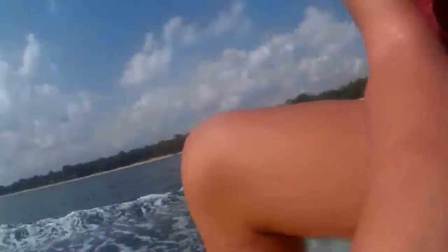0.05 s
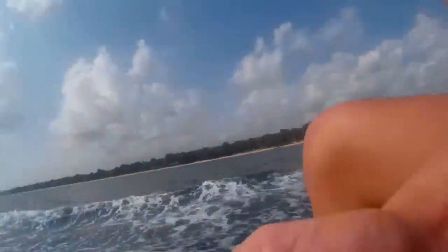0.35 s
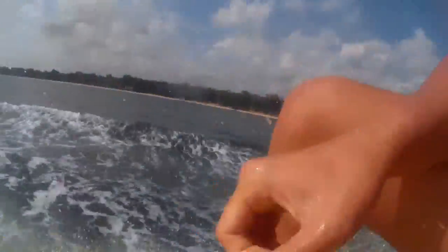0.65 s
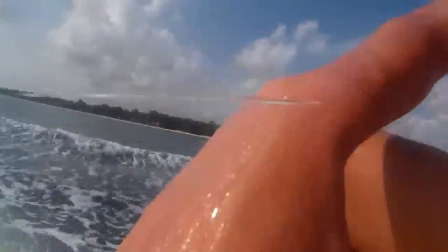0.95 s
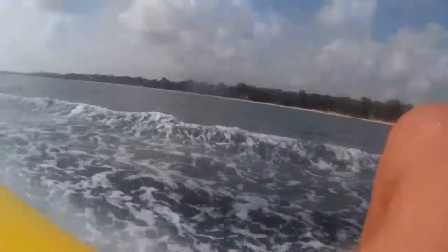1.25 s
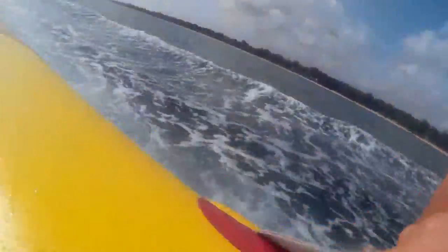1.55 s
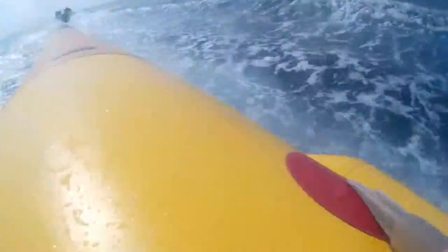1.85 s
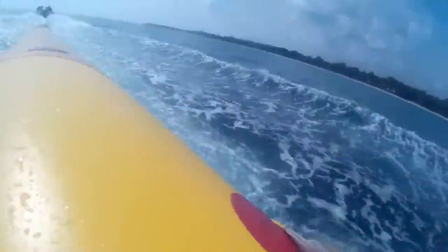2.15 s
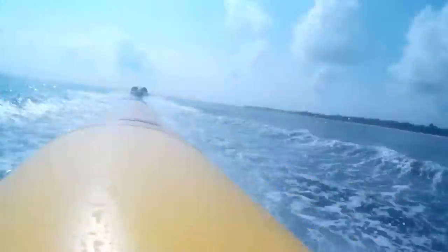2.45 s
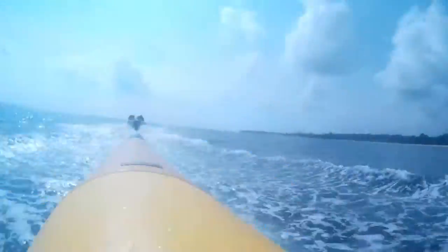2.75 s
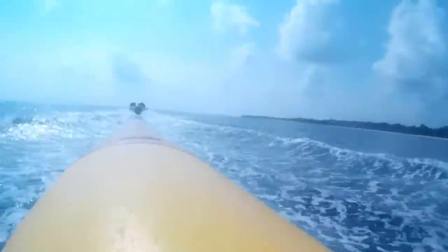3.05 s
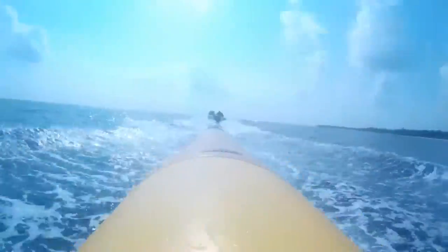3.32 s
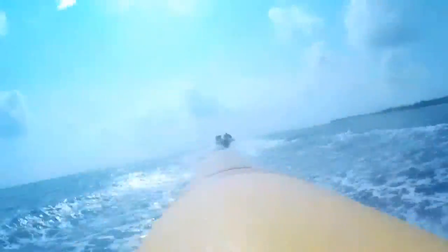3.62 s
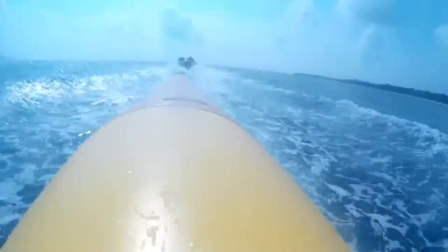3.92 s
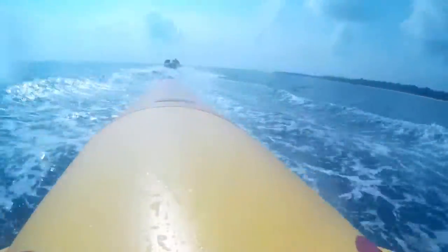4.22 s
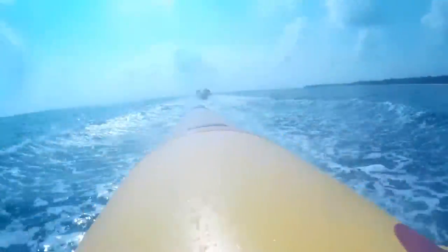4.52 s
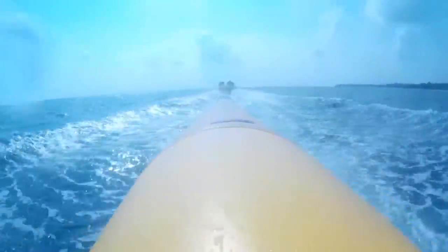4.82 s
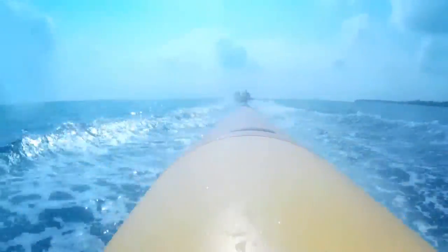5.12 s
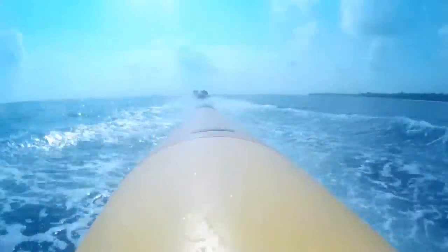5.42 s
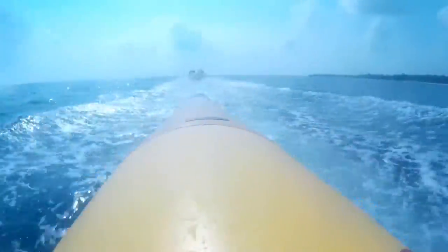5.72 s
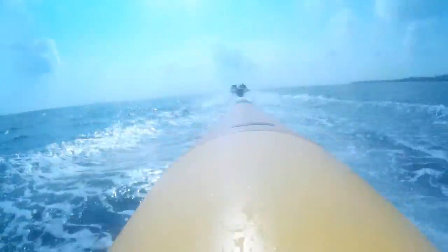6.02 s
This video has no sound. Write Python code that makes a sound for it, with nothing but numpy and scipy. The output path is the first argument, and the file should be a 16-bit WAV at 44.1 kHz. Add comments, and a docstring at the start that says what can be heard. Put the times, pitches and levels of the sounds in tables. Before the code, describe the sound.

Heard from inside a waterproof camera case on an inflatable towed over the sea, drops tick irregularly over buffeting wind and a muffled, gurgling wake. Fine spray sizzles past, then slugs of water thump and knock in quick succession, with one hard knock near the middle. Air hoots faintly and briefly in the mount. More thumps follow, the wind stays up, and a last sheet of spray sweeps over.

```python
"""A camera in a waterproof case rides an inflatable towed fast over the sea.
From the start, drops tick on the case and wind buffets it over the muffled wake and tow boat's engine.
Sheets of fine spray sizzle past; near 1.7 s slugs of water thump the wall in quick succession.
From 2.3 s air hoots in a gap of the mount. The hardest knock lands at 3 s, more thumps near 3.7 s.
Then the wind stays up, and a last sheet of spray sweeps over at 6.1 s."""
import sys
import numpy as np
from scipy import signal
from scipy.fft import rfft, irfft, next_fast_len
from scipy.io import wavfile

SR = 44100
rng = np.random.default_rng(int(sys.argv[2]) if len(sys.argv) > 2 else 0)


def inscribe(sig):
    """Save sig as 16-bit PCM at rate SR to the path in sys.argv[1].

    A 1-D sig is mono; a 2-D sig holds one channel per row.
    Samples are clipped to [-1, 1] before scaling.
    """
    pcm = np.round(np.clip(np.atleast_2d(sig).T, -1, 1) * 32767)
    wavfile.write(sys.argv[1], SR, pcm.astype(np.int16))


N = 276771
TIME_S = np.arange(N) / SR
HIT_TIME_S = np.arange(4096) / SR

# large drops on the case: t/s, relative level/dB, ring f/Hz, splatter re impact/dB
DROP_HITS = [(0.0839, -30, 4400, -7), (0.172, -34, 4090, -15), (0.2237, -31, 4460, -4.5),
             (0.3366, -29.5, 3160, -22), (0.4289, -28.5, 4640, -15), (0.5463, -26.5, 4400, -3),
             (0.616, -29, 4620, -2), (0.6714, -30, 3980, -5.5), (0.7156, -24.5, 2440, -10),
             (0.7364, -25.5, 4420, -7), (0.8264, -30.5, 4530, -5), (0.8919, -29, 4470, -3.5),
             (0.9968, -26.5, 4440, -9), (1.1638, -25.5, 2940, -3), (1.266, -32.5, 4540, -14),
             (1.5019, -31, 2810, -4), (1.6779, -17.5, 4170, 0), (1.7394, -28.5, 2350, -1.5),
             (1.7921, -22.5, 3900, 0), (1.8917, -28, 2350, -4.5), (2.1062, -36, 4500, -10),
             (2.158, -36, 3030, 4.5), (2.371, -26, 4300, -4.5), (2.4431, -23, 3900, -6),
             (2.466, -31, 4540, -11), (2.592, -25.5, 3910, -8), (2.6457, -21.5, 2350, -7),
             (2.6791, -29.5, 2945, -12), (2.7497, -21, 3920, 0.5), (2.8438, -22.5, 2310, 1),
             (2.8953, -31.5, 2960, -7.5), (3.1764, -26, 3230, -6), (3.2643, -28.5, 2970, -6.5),
             (3.3646, -32, 4680, -9), (3.5516, -28.5, 4610, -3.5), (3.6083, -17.5, 3960, -3.5),
             (3.6527, -30, 4490, 4), (3.715, -26.5, 3780, -20), (3.7303, -16.5, 3260, -4),
             (3.9477, -34, 2520, 3), (3.9646, -27, 3780, -10), (4.0827, -36, 4670, -16),
             (4.129, -26.5, 4600, -7.5), (4.162, -28.5, 4620, -5.5), (4.1999, -28.5, 4700, -9),
             (4.2416, -29.5, 4690, -13), (4.347, -28, 4520, -21), (4.411, -27.5, 4480, -6.5),
             (4.6377, -28.5, 4270, -19), (4.7651, -30, 4680, -1.5), (4.792, -27.5, 4610, -1),
             (4.8331, -24, 4600, -3), (4.8728, -27, 4670, -12), (4.9175, -28.5, 4600, -16),
             (5.009, -37.5, 4700, -8), (5.1233, -23, 3120, -6), (5.3108, -29, 3600, -13),
             (5.3895, -29.5, 4540, 0), (5.4635, -32, 4090, -1), (5.5884, -29.5, 4600, -21),
             (5.7848, -32, 2970, 1.5), (5.8186, -25, 3100, -9), (5.8606, -24, 4680, -10),
             (6.0013, -27.5, 3100, -5.5), (6.0788, -29, 2837, -3.5), (6.2452, -23, 2890, -5)]
# slugs of water flexing the case: t/s, level/dB, nominal f/Hz, gush re swing/dB
SLUG_HITS = [(0.183, -31.5, 70, -3.5), (0.215, -25.5, 68, -22), (0.54, -24.5, 110, -17),
             (0.791, -17.5, 72.5, -29), (1.631, -26, 83.4, -5), (1.665, -15.5, 78.5, -5),
             (1.789, -12.5, 126, -8), (1.817, -15, 81, -17.5), (1.888, -26.5, 64.6, -12),
             (2.246, -6, 280, -15), (2.369, -23, 75.5, -13.5), (2.841, -22, 69.6, -16),
             (3.029, -11, 380, -24), (3.151, -30.5, 75.6, -8), (3.605, -24.5, 72.7, -8.5),
             (3.641, -24, 130, -3), (3.723, -10, 74, -12.5), (3.944, -13, 188, -20.5),
             (5.862, -17.5, 82, -12.5)]
# hard blows on the case: t/s, peak level/dB, ring f/Hz
KNOCK_HITS = [(0.943, -25, 1380), (1.522, -26.5, 1490), (1.531, -31, 1420), (1.709, -20.5, 1360),
              (1.789, -16, 525), (2.158, -23.5, 650), (2.248, -13.5, 490), (2.288, -23, 720),
              (2.304, -14, 1140), (2.647, -20.5, 1900), (2.676, -15.5, 620), (3.028, -1, 1102),
              (3.608, -43.5, 1735), (3.729, -17, 460), (4.401, -13, 533)]
# low modes of the case: f/Hz, width/Hz, relative level/dB
CASE_MODES = [(339, 515, 1), (1094, 75, 1), (1222, 192, 2), (1944, 440, 4.5)]
# bubbles trapped on the case: t/s, f/Hz, peak level/dB, t60/s
TRAPPED_BUBBLES = [(1.504, 2780, -16.5, 0.0062), (1.535, 1575, -13.5, 0.0094), (1.709, 1625, -30, 0.049),
                   (2.287, 3780, -35.5, 0.04), (2.304, 3730, -31.5, 0.012)]
# sheets of spray: t/s, hold/s, relative fizz level/dB, wash level/dB
SPRAY_SHEETS = [(0.548, 0.027, -45.5, -62), (0.683, 0.051, -52, -71), (1.319, 0.08, -49.5, -71),
                (1.527, 0.01, -64, -39), (1.675, 0.055, -55, -43), (1.791, 0.041, -52, -47),
                (2.56, 0.092, -48.5, -41.5), (3.436, .04, -57, -69), (3.61, 0.071, -57.5, -46.5),
                (6.131, .16, -46.5, -50)]
# wind and water crossing a gap in the mount: t/s, length/s, f/Hz, level/dB, roughness/1
GAP_NOTES = [(2.263, 0.055, 400, -30.5, 1.18), (2.948, 0.046, 480, -41.5, 0.75),
             (3.177, 0.087, 341, -42, 0.75), (3.618, 0.03, 400, -39.5, 1), (4.294, 0.12, 500, -33.5, 0.44),
             (4.571, 0.025, 480, -42, 1.05), (5.072, 0.02, 405, -34, 0.1), (5.121, 0.032, 340, -32.5, 0.95),
             (5.123, 0.079, 517, -35.5, 0.85), (5.628, .09, 515, -45, 0.76),
             (5.797, 0.063, 360.5, -31.5, 1.08), (5.86, 0.02, 380, -30, 0.9)]

# envelopes of wind, wake and water along the hull: t/s, relative level/dB
WIND_LEVEL = [(0.0, -50.5), (0.56, -42), (1.12, -38.5), (1.35, -48), (1.57, -54), (1.75, -35.5),
              (2.01, -53), (3.11, -46.5), (3.37, -50.5), (3.51, -52.5), (3.79, -42), (4.34, -44.5),
              (4.65, -39), (4.89, -44.5), (5.23, -39.5), (6.28, -43)]
WAKE_LEVEL = [(0.0, -55.5), (0.38, -56.5), (1.76, -55), (1.91, -58.5), (2.15, -56.5), (2.34, -55.5),
              (2.59, -53), (2.87, -56), (3.15, -56), (3.93, -57.5), (4.3, -57), (5.0, -58.5), (5.23, -55.5),
              (5.79, -58), (6.03, -58), (6.28, -56)]
CHURN_LEVEL = [(0.0, -55), (0.31, -51), (2.11, -57.5), (2.34, -50.5), (2.92, -58), (3.13, -50),
               (3.37, -53.5), (5.3, -49.5), (5.4, -55.5), (6.28, -50)]

# source spectra: f/Hz, relative level/dB
DROP_SPECTRUM = [(300, -9.5), (900, -8), (1600, 2), (2700, -5), (3500, -7.5), (4500, -4), (5100, -5.5),
                 (6050, -17), (6800, -12), (8700, -21.5), (9500, -19.5), (10200, -22.5), (11300, -17.5),
                 (14000, -33)]
SPRAY_SPECTRUM = [(700, -14), (1600, 26.5), (2800, 13), (3950, 8.5), (5000, 5), (6200, -17), (8000, 11),
                  (9500, -1.5), (11500, 13.5), (13000, -35), (16000, -29)]
WIND_SPECTRUM = [(18, -17), (30, 1.5), (58, 2.5), (85, -1), (125, -8), (180, -19), (300, -26.5),
                 (700, -52.5), (4000, -73)]
WAKE_SPECTRUM = [(300, 2), (650, -0.5), (880, 0), (1100, -3), (1290, 6), (1480, -1), (1900, 3),
                 (2400, -12.5), (3200, -24), (6000, -42), (12000, -56)]
CHURN_SPECTRUM = [(60, -25), (160, -3.5), (330, -4.5), (520, -5.5), (620, -13), (800, -15.5), (1400, -65.5),
                  (4000, -106)]
HISS_SPECTRUM = [(1000, -2.5), (3000, 0.5), (3900, -5.5), (4800, -2), (7000, -8.5), (15000, -9)]


def drop(db, hz, splatter_db, impact_s=0.0016, splatter_s=0.00097, lag_s=0.00481, gain_db=-26):
    """A drop ticks on the case; its rim collapses in a splatter milliseconds later."""
    lag, length, snap = from_db(rng.uniform(-4, 4, 3))
    force = burst(0, impact_s * length) + from_db(splatter_db) * burst(lag_s * lag, splatter_s)
    force = force + from_db(1) * resonate(force, hz, width_hz=550)   # the spot hit favours one pitch
    edge_hz = np.clip(7500 * snap * from_db((db + 26) / 2), 2500, 12000)   # harder is brighter
    force = signal.sosfilt(signal.butter(2, edge_hz, fs=SR, output="sos"), force)
    splatter_gain = np.sqrt(1 + from_db(2 * splatter_db))
    return from_db(db + gain_db) * splatter_gain * rms_one(colour(force, DROP_SPECTRUM))


def drops(gain_db=3, delay_s=0.00045):
    """Large drops strike the case one by one."""
    out = np.zeros(N)
    for t_s, db, hz, splatter_db in DROP_HITS:
        add(out, t_s + delay_s, drop(db + gain_db, hz, splatter_db))
    return out


def patter(scatter_s=0.064, relative_db=-33, spread_db=8.5, low_hz=2850, high_hz=4930):
    """Spray flies in bunches: a small drop lands just before or after each large one."""
    out = np.zeros(N)
    for t_s, *_ in DROP_HITS:
        when, size, spot = rng.random(3)
        landing_s = min(t_s + scatter_s * (2 * when - 1), TIME_S[-1])
        db = relative_db + spread_db * (2 * size - 1)
        hz = low_hz * (high_hz / low_hz) ** spot
        add(out, landing_s, drop(db, hz, splatter_db=-9))
    return out


def thumps(width_cycles=0.38, gush_s=0.0082):
    """A slug of water pushes the wall in fast, lets it spring back more slowly, then gushes off."""
    out = np.zeros(N)
    for t_s, db, hz, gush_db in SLUG_HITS:
        cycles = 1.42 * np.log1p(hz * HIT_TIME_S)
        envelope = cycles * np.exp(-0.5 * (cycles / width_cycles) ** 2)
        swing = -np.sin(2 * np.pi * cycles) * envelope
        gush = colour(burst(delay_s=0.00534, decay_s=gush_s), CHURN_SPECTRUM)
        add(out, t_s, from_db(db) * (peak_one(swing) + from_db(gush_db) * peak_one(gush)))
    return out


def knocks(wall_hz=1950, push_db=-13, contact_s=0.00029, scatter_db=-50):
    """Hard blows ring the low modes of the case; the wall passes little above them."""
    out = np.zeros(N)
    wall = signal.butter(7, wall_hz, fs=SR, output="sos")
    edge = signal.unit_impulse(len(HIT_TIME_S))
    push = from_db(push_db) * np.exp(-HIT_TIME_S / contact_s)
    for t_s, db, spot_hz in KNOCK_HITS:
        water_scatter = from_db(scatter_db) * burst(delay_s=0.00266, decay_s=0.0039)
        force = edge + push + water_scatter
        modes = sum((-1) ** k * from_db(mode_db) * resonate(force, hz, width_hz)
                    for k, (hz, width_hz, mode_db) in enumerate(CASE_MODES))
        ring = signal.sosfilt(wall, modes + resonate(modes, spot_hz, width_hz=800))
        add(out, t_s, from_db(db) * peak_one(ring))
    return out


def plinks():
    """A bubble trapped by a splash rings briefly."""
    out = np.zeros(N)
    for t_s, hz, db, t60_s in TRAPPED_BUBBLES:
        envelope = from_db(db - 60 * HIT_TIME_S / t60_s)
        add(out, t_s, envelope * np.sin(2 * np.pi * hz * HIT_TIME_S))
    return out


def sheets(rise_s=0.014, fall_s=0.018):
    """Each sheet of spray sweeps in, holds and drains: gains of its fizz and its wash."""
    fizz, wash = np.full(N, 1e-6), np.zeros(N)
    for t_s, hold_s, fizz_db, wash_db in SPRAY_SHEETS:
        before_s = np.maximum(t_s - TIME_S, 0)
        after_s = np.maximum(TIME_S - t_s - hold_s, 0)
        envelope = np.exp(-before_s / rise_s - after_s / fall_s)
        fizz += from_db(fizz_db) * envelope
        wash += from_db(wash_db) * envelope
    return fizz, wash


def spray(mist_db=-9.5, droplet_db=16.5, droplets_per_s=140, stray_db=-40, stray_share=0.11):
    """Sheets of fizzing mist full of droplets; a few strays land in between."""
    fizz_gain, _ = sheets()
    mist = rng.standard_normal(N) * from_db(6 * drift(rate_hz=90))
    out = from_db(mist_db) * fizz_gain * rms_one(colour(mist, SPRAY_SPECTRUM))
    for when, size, spot, chance in rng.random((int(droplets_per_s * N / SR), 4)):
        sample = int(when * N)
        sheet_db = 20 * np.log10(fizz_gain[sample]) + droplet_db
        if sheet_db > stray_db or chance < stray_share:
            db = max(sheet_db, stray_db) + 10 * (size - 0.5)
            add(out, sample / SR, drop(db, hz=1700 * 3 ** spot, splatter_db=-14))
    return out


def wind(gain_db=5):
    """Eddies press on the shell."""
    return from_db(gain_db) * level(WIND_LEVEL) * turbulence(WIND_SPECTRUM, swell_db=2.2, rate_hz=16)


def hoots(waver=0.15, rasp=0.73):
    """Air catches a gap and sounds a short note; gusts and water shake its pitch and strength."""
    out = np.zeros(N)
    bend, flutter = np.tanh(drift(rate_hz=70)), drift(rate_hz=80)
    froth = drift(rate_hz=110) + 1j * drift(rate_hz=110)
    for t_s, length_s, hz, db, roughness in GAP_NOTES:
        progress = np.clip((TIME_S - t_s) / length_s, 0, 1)
        envelope = 4 * progress * (1 - progress)
        phase = 2 * np.pi * hz * np.cumsum(1 + waver * roughness * bend) / SR
        froth_share = np.clip(rasp * roughness ** 2, 0, 1)   # water breaks the note up
        breakup = np.sqrt(1 - froth_share) + np.sqrt(froth_share / 2) * froth
        note = np.real(np.exp(1j * phase) * breakup)
        out += from_db(db + 2.5 * roughness * flutter) * envelope * note
    return out


def churn(low_hz=220, high_hz=570, gurgle_db=-4):
    """Water sloshes along the hull; trapped air pockets gurgle."""
    pockets = sum(resonate(grains(per_s=40, spread_db=2.5), hz, width_hz=35)
                  for hz in np.geomspace(low_hz, high_hz, num=8))
    slosh = turbulence(CHURN_SPECTRUM, swell_db=3, rate_hz=25)
    return level(CHURN_LEVEL) * water_film() * rms_one(slosh + from_db(gurgle_db) * rms_one(pockets))


def wake(bubble_db=-5, gain_db=3):
    """Foam rushes behind the hull, bubbles bursting in it; sheets of spray wash it over the case."""
    _, wash_gain = sheets()
    rush_gain = from_db(gain_db) * level(WAKE_LEVEL) * water_film()
    bubbles = rms_one(colour(grains(per_s=400, spread_db=5.5), WAKE_SPECTRUM))
    foam = turbulence(WAKE_SPECTRUM, swell_db=1.8, rate_hz=20)
    return np.hypot(rush_gain, wash_gain) * rms_one(foam + from_db(bubble_db) * bubbles)


def water_film(max_loss_db=8.5, drain_s=0.16, slow_below_hz=150):
    """Gain of the sea: each slow slug leaves a film on the case that damps it until it drains."""
    slugs = [(t_s, db) for t_s, db, hz, _ in SLUG_HITS if hz < slow_below_hz]
    top_db = max(db for _, db in slugs)
    cover = np.zeros(N)
    for t_s, db in slugs:
        draining = (TIME_S > t_s) * np.exp(-((TIME_S - t_s) / drain_s) ** 2)
        cover += from_db(db - top_db) ** 2 * draining
    return from_db(-max_loss_db * np.minimum(cover, 1))


def engine(hz=336.5, level_db=-60, waver=0.0112, flutter_db=3):
    """The distant outboard: one faint wavering note."""
    phase = 2 * np.pi * np.cumsum(hz * (1 + waver * drift(rate_hz=3.34))) / SR
    flutter = from_db(flutter_db * drift(rate_hz=4.2))
    return from_db(level_db) * rms_one(np.sin(phase) * flutter)


def hiss(level_db=-68.5):
    """Faint steady noise floor."""
    return from_db(level_db) * rms_one(colour(rng.standard_normal(N), HISS_SPECTRUM))


def burst(delay_s, decay_s, rise_s=0.00008):
    """Water shatters on plastic: a sudden, fast-dying crackle."""
    age_s = np.maximum(HIT_TIME_S - delay_s, 0)
    envelope = -np.expm1(-age_s / rise_s) * np.exp(-age_s / decay_s)
    return rms_one(rng.standard_normal(len(age_s)) * envelope)


def turbulence(spectrum, swell_db, rate_hz):
    """Coloured noise that swells with each passing eddy."""
    return rms_one(colour(rng.standard_normal(N), spectrum) * from_db(swell_db * drift(rate_hz)))


def grains(per_s, spread_db):
    """Random tiny impacts, many small, a few large."""
    sizes = from_db(spread_db * np.minimum(rng.exponential(1, N), 4))
    return sizes * rng.choice([-1, 1], N) * (rng.random(N) < per_s / SR)


def drift(rate_hz):
    """Slow random wander, unit RMS."""
    hop, settle_steps = 40, 2000
    pole = np.exp(-2 * np.pi * rate_hz * hop / SR)
    noise = rng.standard_normal(N // hop + settle_steps + 2)
    slow = signal.lfilter([1], [1, -2 * pole, pole * pole], noise)[settle_steps:]
    return np.interp(np.arange(N) / hop, np.arange(len(slow)), rms_one(slow))


def colour(x, spectrum):
    """Minimum-phase filter with the given spectrum."""
    size = 2 * next_fast_len(len(x) // 2 + 1024)
    hz, db = np.transpose(spectrum)
    bins_hz = np.fft.rfftfreq(size, 1 / SR)
    gain = from_db(np.interp(np.log(bins_hz + 1), np.log(hz), db))
    cepstrum = irfft(np.log(gain))
    cepstrum[1:size // 2] *= 2
    cepstrum[size // 2 + 1:] = 0
    return irfft(rfft(x, size) * np.exp(rfft(cepstrum)))[:len(x)]


def resonate(x, hz, width_hz):
    """One resonance, unit peak gain."""
    radius = np.exp(-np.pi * width_hz / SR)
    feedback = [1, -2 * radius * np.cos(2 * np.pi * hz / SR), radius ** 2]
    return signal.lfilter(np.array([1, 0, -1]) * (1 - radius ** 2) / 2, feedback, x)


def level(rows):
    """Level curve to gain per sample."""
    return from_db(np.interp(TIME_S, *np.transpose(rows)))


def from_db(db):
    """Decibels to gain."""
    return 10 ** (np.asarray(db) / 20)


def rms_one(x):
    """Scale to unit RMS."""
    return x / np.sqrt(np.mean(x ** 2) + 1e-20)


def peak_one(x):
    """Scale to unit peak."""
    return x / np.abs(x).max()


def add(out, t_s, sound):
    """Mix a sound in at t_s."""
    start = max(int(t_s * SR), 0)
    out[start:start + len(sound)] += sound[:N - start]


def scene():
    """Everything reaches one microphone inside the case."""
    noise_floor = hiss()
    water = wake() + churn() + spray() + drops() + patter() + thumps() + knocks() + plinks()
    return (water + wind() + hoots() + engine() + noise_floor)[None]


def record(dry):
    """The microphone rounds off the hardest knock; the top is cut steeply."""
    ceiling, cutoff_hz = 0.9, 16000
    rounded = dry / (1 + (dry / ceiling) ** 8) ** (1 / 8)
    return signal.sosfilt(signal.ellip(10, 0.2, 80, cutoff_hz, fs=SR, output="sos"), rounded)


dry = scene()
out = record(dry)
inscribe(out)
```